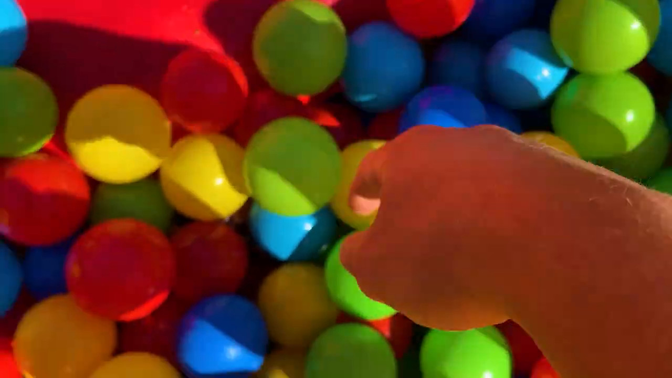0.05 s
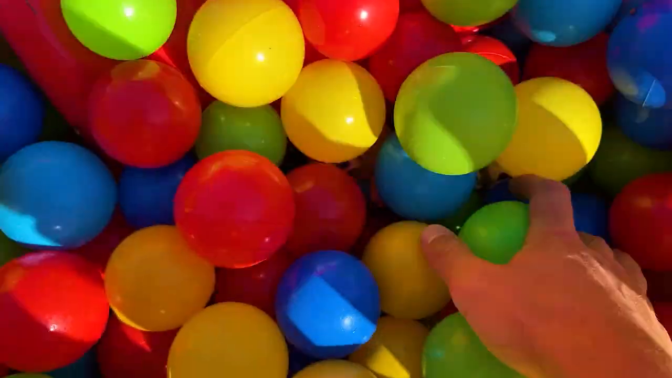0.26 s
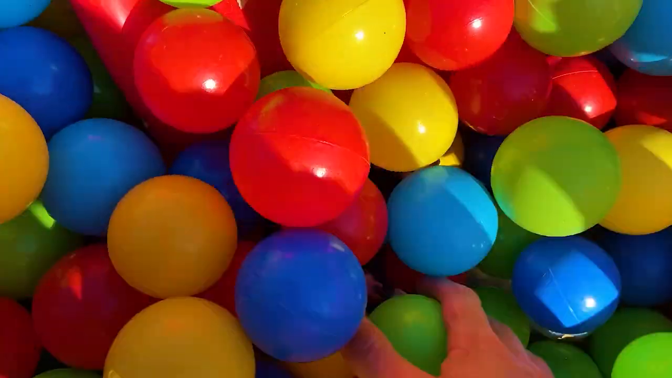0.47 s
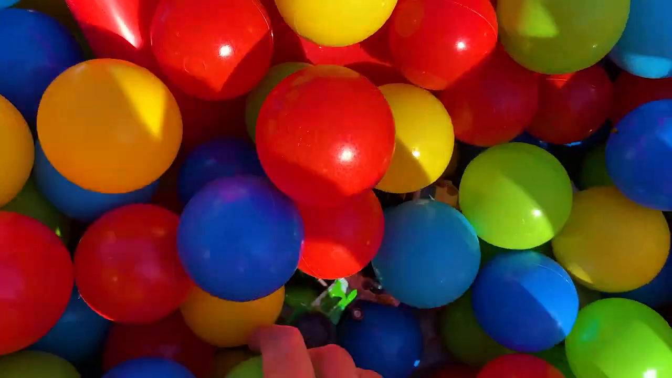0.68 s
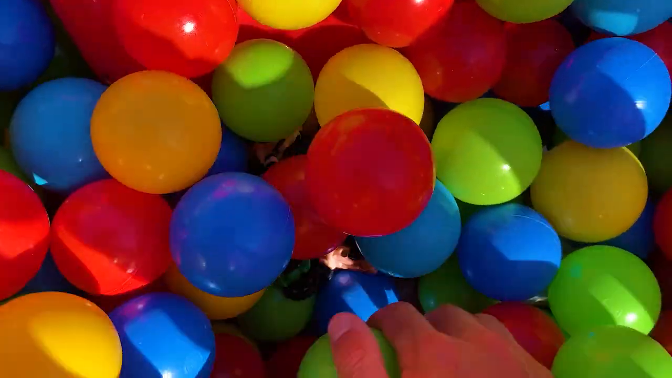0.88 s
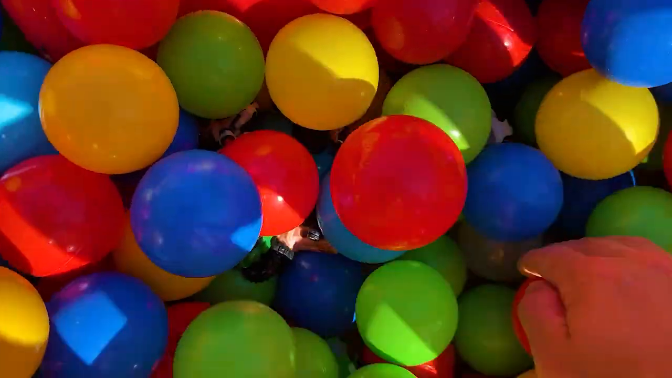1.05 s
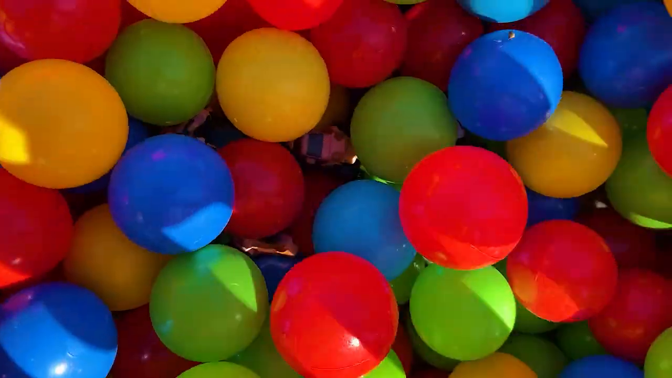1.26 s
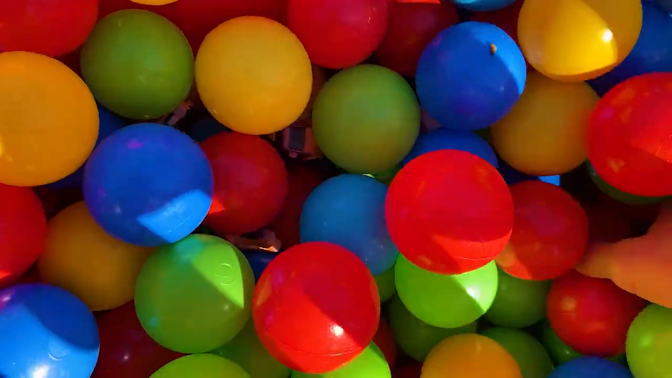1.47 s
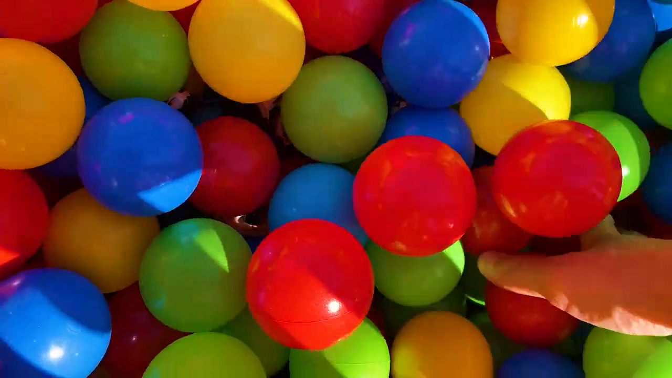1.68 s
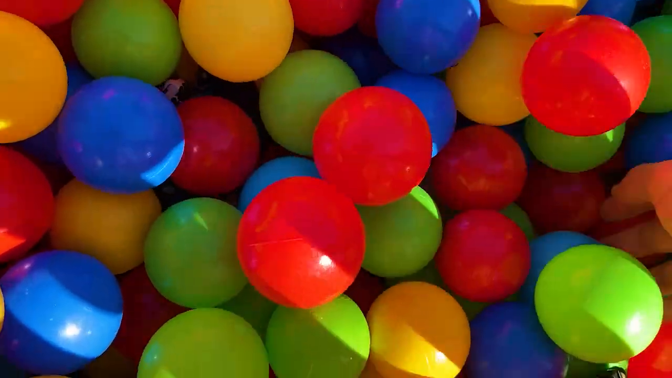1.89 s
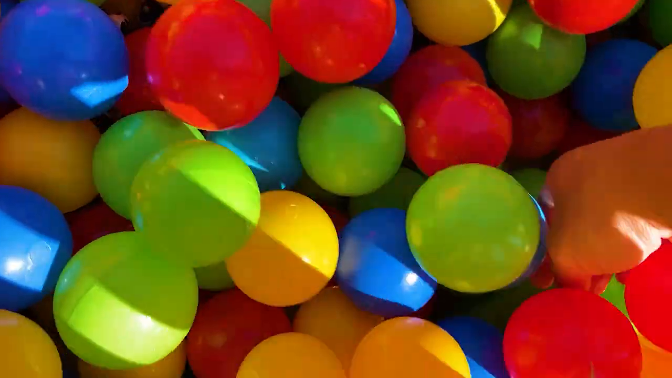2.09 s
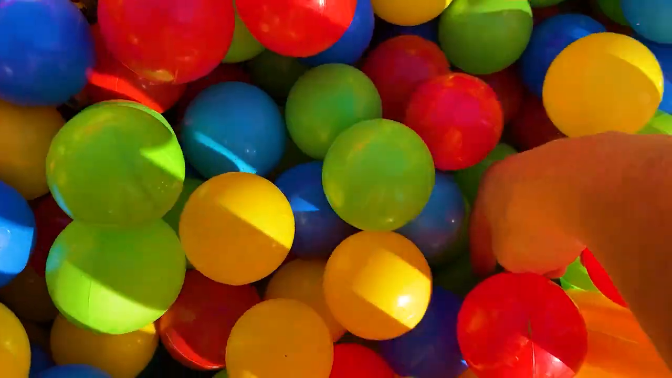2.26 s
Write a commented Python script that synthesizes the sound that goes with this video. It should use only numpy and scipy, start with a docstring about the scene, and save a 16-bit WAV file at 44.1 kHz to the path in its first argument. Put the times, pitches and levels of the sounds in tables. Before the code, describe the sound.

Hollow plastic balls knock together in a pit, close and dry. Until 0.17 s there is only low murmur, two soft nudges and faint hiss. A dense clatter with thuds, bright snaps and dent pops fills 0.2-0.75 s; a tiny hard chink follows near 0.78. Sparser knocks, deep heaving and short scrapes lead to another flurry around 1.6-1.75, then loose knocks until 2.3 s.

```python
"""A hand rummages through a pit of thin hollow plastic balls, close to the microphone.
At first there is only a murmur and two soft nudges over a faint hiss that lasts throughout. Then the hand
goes in: balls knock, ring and thud, seams snap, dents pop, and something small chinks. The heap heaves
deeply and balls scrape; another flurry of knocks and snaps follows, then looser knocks to the end.
Ringing filters make the balls, random clicks the rubbing and jostling, and shaped noise the rumble."""
import sys
import numpy as np
from scipy import signal
from scipy.fft import rfft, irfft, next_fast_len
from scipy.io import wavfile
from scipy.ndimage import uniform_filter1d

SR = 44100
rng = np.random.default_rng(int(sys.argv[2]) if len(sys.argv) > 2 else 0)


def generate_wav(sig):
    """Save sig (samples, or channels by samples) to the path in sys.argv[1] as 16-bit PCM at SR."""
    pcm = np.round(np.clip(np.atleast_2d(sig).T, -1, 1) * 32767).astype(np.int16)
    wavfile.write(sys.argv[1], SR, pcm)


N = 101430
TIME = np.arange(N) / SR  # seconds
HIT = 8192  # samples set aside for one hit


# Ball against ball, before the trims below: (t/s, ring level/dB, main ring f/Hz, shell clack level/dB,
# thud level/dB, left-over-right level/dB)
KNOCKS = [(0.176, -31, 307, -41.5, -28.5, -2), (0.214, -28.5, 403, -40, -22.5, -5),
          (0.237, -20.5, 1110, -25.5, -50, -5), (0.249, -20.5, 840, -36, -35, -7),
          (0.306, -20, 412, -22.5, -31, -9), (0.321, -19.5, 840, -36, -34, -9),
          (0.3261, -17.5, 406, -44, -28, -2), (0.3315, -19, 696, -23, -43, -3),
          (0.338, -28, 637, -27.5, -27.5, 7), (0.359, -26, 385, -27, -28, -7),
          (0.384, -31, 404, -39, -34, -9), (0.416, -24, 405, -26, -31, -4),
          (0.449, -25.5, 294, -28, -27, -1), (0.473, -23.5, 299, -30, -24, -1),
          (0.498, -24.5, 304, -27, -20, 4), (0.518, -30, 252, -42, -21, 4),
          (0.526, -33.5, 1190, -23, -31, -4), (0.56, -38, 313, -36, -21.5, 7),
          (0.592, -38, 605, -26, -52, 8), (0.614, -27, 310, -22, -36, 1),
          (0.637, -21.5, 1180, -24.5, -22.5, 0), (0.66, -32.5, 382, -33, -23.5, 2),
          (0.705, -37.5, 1114, -26, -27, 0), (0.718, -34.5, 313, -28.5, -19.5, -5),
          (0.748, -31, 390, -31, -29.5, 4), (0.802, -37.5, 1030, -42, -44, 1),
          (0.827, -28.5, 560, -32, -52, -5.5), (0.893, -29, 890, -35, -56, -7),
          (0.942, -28.5, 890, -33, -26.5, -6), (1.028, -37, 890, -37, -27.5, -7),
          (1.112, -29, 324, -28, -49, -5), (1.127, -41, 345, -34, -25, 7), (1.195, -49, 1070, -43, -24, 4),
          (1.22, -31, 1010, -36, -44, -6), (1.239, -31, 754, -56, -29, -12),
          (1.299, -32, 380, -35.5, -41, -5), (1.372, -36.5, 346, -39, -36, -4),
          (1.415, -27, 553, -41, -24, -6), (1.484, -44, 370, -41, -46, -8),
          (1.502, -35.5, 388, -63, -28, -11), (1.569, -30.5, 493, -31, -36, -2),
          (1.584, -22, 374, -49, -39, -8), (1.62, -21.5, 360, -37, -27, -7), (1.644, -28, 400, -43, -36, 0),
          (1.696, -34, 356, -48, -49, -3), (1.744, -24, 890, -36, -49, -6),
          (1.7535, -24.5, 560, -36, -48, -2), (1.808, -30, 660, -31.5, -37, -1),
          (1.938, -31, 910, -47, -31.5, -5), (1.986, -25, 890, -25, -46, -8),
          (1.9925, -30, 700, -30, -48, -2), (2.001, -26, 527, -40, -54, -5), (2.037, -33, 725, -34, -39, 1),
          (2.087, -38, 1140, -36, -60, -4), (2.14, -30, 400, -29.5, -34, -4),
          (2.172, -45, 716, -31, -59, 2), (2.2, -29.5, 516, -28.5, -54, -4.5),
          (2.278, -39.5, 786, -41, -45, -7), (2.294, -42, 740, -39, -45, -4)]
# How a hollow ball rings, before each ball's own variation: (f/Hz, level/dB, t60/s)
BALL_MODES = [(230, -9, 0.12), (321.5, 0, 0.093), (384.4, 0, 0.14), (488.5, -1.5, 0.09), (657.5, 1, 0.046),
              (807, -5, 0.1), (883, 0, 0.059), (1106, 2.5, 0.045), (1369, -5.5, 0.1)]
# How its thin shell clacks, before the same variation: (f/Hz, level/dB, t60/s)
CLACK_MODES = [(1298, 2.5, 0.015), (1764.5, -2, 0.02), (2187, -2, 0.026), (2810, -2.5, 0.014),
               (3433, -6, 0.024), (4290, -12, 0.03)]
# Relative tone of the hollow ring: (f/Hz, level/dB)
RING_TONE = [(60, -11.5), (200, -1), (400, 3), (800, 2.5), (1300, -7.5), (2500, -8.5), (6000, 9.5),
             (16000, -34)]
# Relative tone of the clack: (f/Hz, level/dB)
CLACK_TONE = [(200, -51), (800, 19.5), (1500, 6), (3000, -2), (5000, -6.5), (8000, 15.5), (16000, 6)]
# Relative tone of the thud: (f/Hz, level/dB)
THUD_TONE = [(25, -63), (55, -10), (100, -9.5), (160, -2), (230, 1), (330, -7), (700, -33.5), (3000, -64)]
RING_TRIM_DB, CLACK_TRIM_DB, THUD_TRIM_DB = 0, -3.5, -1
RING_ECHO_T60_S, CLACK_ECHO_T60_S, THUD_T60_S = 0.1, 0.053, 0.058
MAIN_MODE_DB, MAIN_MODE_CYCLES = -0.5, 20  # cycles until it has died by 60 dB
POP_DB, POP_CYCLES = -4, 4  # against the ring; cycles until it has died by 60 dB
CLACK_PITCH_SPREAD = .045  # on a natural-log pitch scale


def knocks():
    """Two balls meet: a direct pop, a hollow ring led by one mode, a shell clack and a thud into the heap."""
    out = np.zeros((2, N))
    strike = press()
    for s, ring_db, hz, clack_db, thud_db, pan_db in KNOCKS:
        contact = scatter(RING_ECHO_T60_S)
        main_mode = rms_one(ring(contact, hz, MAIN_MODE_CYCLES / hz))
        hollow = rms_one(shell(contact, BALL_MODES)) + from_db(MAIN_MODE_DB) * main_mode
        pop = from_db(POP_DB) * rms_one(ring(strike, hz, POP_CYCLES / hz))
        add(out, s, voice(rms_one(hollow) + pop, RING_TONE), ring_db + RING_TRIM_DB, pan_db)

        clack = shell(scatter(CLACK_ECHO_T60_S), CLACK_MODES, CLACK_PITCH_SPREAD)
        add(out, s, voice(clack, CLACK_TONE), clack_db + CLACK_TRIM_DB, pan_db / 2)

        thud = voice(scatter(THUD_T60_S), THUD_TONE)
        add(out, s, thud, thud_db + THUD_TRIM_DB)
    return out


POP_CONTACT_S = 0.00077  # how long the two shells stay pressed together


def press():
    """The short smooth push of two shells meeting, equal on both sides."""
    push = np.zeros((2, HIT))
    push[0] = np.sin(np.pi * np.minimum(TIME[:HIT] / POP_CONTACT_S, 1)) ** 2
    return push


# Seams snapping past each other, before the trims below: (t/s, level/dB, main f/Hz, top-treble level/dB)
SNAPS = [(0.1765, -31.5, 3000, -63), (0.237, -14.5, 3400, -50), (0.3051, -17.5, 3820, -30.5),
         (0.322, -22, 3320, -33), (0.445, -27, 6300, -43), (0.498, -17, 7100, -33),
         (0.527, -24, 3320, -34.5), (0.5885, -21.5, 5770, -40), (0.637, -21, 7150, -28.5),
         (0.665, -25, 6900, -45), (0.6811, -17.5, 3900, -29.5), (0.704, -12.5, 3110, -27.5),
         (0.7603, -23, 5620, -38.5), (0.8078, -26.5, 3660, -49), (0.938, -22, 3480, -43),
         (0.975, -28, 7200, -41), (1.3554, -30.5, 3250, -47.5), (1.583, -23, 3950, -35),
         (1.5896, -21.5, 6100, -34), (1.616, -20.5, 3420, -35.5), (1.631, -26, 6200, -35.5),
         (1.749, -27, 6250, -42), (1.758, -20.5, 3340, -41), (1.992, -35, 3300, -38.5),
         (2.137, -23.5, 3570, -37.5), (2.1992, -26.5, 3060, -45)]
# Relative tone of the crack: (f/Hz, level/dB)
SNAP_TONE = [(300, -7.5), (1500, 14.5), (3200, -4), (5000, 4), (7000, 2.5), (9000, 1), (16000, -22.5)]
# Relative tone of the fine treble on top: (f/Hz, level/dB)
TOP_TONE = [(1000, -55), (6000, -4), (9000, 2.5), (12500, 0.5), (14300, 3.5), (16000, -1.5)]
SNAP_TRIM_DB, TOP_TRIM_DB, SNAP_PAN_DB = -11, 3, -3.5
SNAP_T60_S, SNAP_RING_T60_S, SNAP_RING_DB = 0.049, .013, -2


def snaps():
    """A seam slips free: a bright crack with one brief resonance, and fine treble on top."""
    out = np.zeros((2, N))
    for s, db, hz, top_db in SNAPS:
        crack = scatter(SNAP_T60_S)
        resonance = rms_one(ring(crack, hz, SNAP_RING_T60_S))
        crack = rms_one(crack) + from_db(SNAP_RING_DB) * resonance
        add(out, s, voice(crack, SNAP_TONE), db + SNAP_TRIM_DB, SNAP_PAN_DB)
        add(out, s, voice(scatter(SNAP_T60_S), TOP_TONE), top_db + TOP_TRIM_DB)
    return out


# Shells denting: (t/s, level/dB, f/Hz)
DENTS = [(0.3073, -23, 525), (0.3418, -17, 654), (1.6211, -35, 394), (1.7436, -29.5, 800)]
DENT_CYCLES = 3.6  # until it has died by 60 dB


def dents():
    """A dented shell springs back with a dry pop, ringing for only a few cycles."""
    out = np.zeros((2, N))
    for s, db, hz in DENTS:
        spring = ring(press(), hz, DENT_CYCLES / hz)
        add(out, s, voice(spring, RING_TONE), db)
    return out


# One ball dragged over another: (t/s, length/s, level/dB)
SCRAPES = [(1.103, 0.024, -30.5), (1.206, 0.034, -32), (1.582, .022, -31), (1.616, 0.039, -33),
           (1.956, 0.021, -36)]
SLIPS_PER_S, SLIP_JITTER = 170, .35  # typical rate; unevenness of the gaps on a natural-log scale
SCRAPE_LOW_CUT_HZ = 420


def scrapes(count=40):
    """A dragged ball sticks and slips in an uneven run; every slip rings its shell."""
    out = np.zeros((2, N))
    low_cut = signal.butter(1, SCRAPE_LOW_CUT_HZ, "high", fs=SR, output="sos")
    for s, length, db in SCRAPES:
        gaps = np.exp(SLIP_JITTER * rng.standard_normal(count)) / SLIPS_PER_S
        at = np.cumsum(gaps) - gaps[0]
        sizes = rng.standard_normal((2, count))
        inside = at < length
        slips = np.zeros((2, HIT))
        slips[:, (at[inside] * SR).astype(int)] = sizes[:, inside]
        rung = shell(slips, BALL_MODES + CLACK_MODES, CLACK_PITCH_SPREAD)
        add(out, s, voice(signal.sosfilt(low_cut, rung), JOSTLE_TONE), db)
    return out


# Shells singing briefly on one resonance as they are struck or slide past each other: (t/s, level/dB, f/Hz)
SHELL_TONES = [(0.3046, -20.5, 1740), (0.319, -28.5, 2310), (1.049, -34, 2350), (1.058, -37, 2365),
               (1.991, -39, 4350), (2.139, -38, 4300), (2.175, -43, 4150), (2.277, -48.5, 4460)]
TONE_PEAK_S, TONE_RING_T60_S = .003, .032  # time to the strongest push; ring


def shell_tones():
    """A shell sings briefly: a short swell of noise keeps one resonance going for a moment."""
    out = np.zeros((2, N))
    swell = TIME[:HIT] * np.exp(-TIME[:HIT] / TONE_PEAK_S)
    for s, db, hz in SHELL_TONES:
        noise = swell * rng.standard_normal((2, HIT))
        add(out, s, voice(ring(noise, hz, TONE_RING_T60_S), CLACK_TONE), db)
    return out


# A short bright chink among the balls; the level drives both ring and crack: (t/s, level/dB)
CHINKS = [(0.763, -42.5), (0.781, -22.5), (0.783, -21), (0.807, -42)]
# What the chink rings with, relative to each touch: (f/Hz, level/dB, t60/s)
CHINK_MODES = [(3690, -4.5, 0.021), (5530, -22, .022), (5850, 5, 0.031), (6280, 1.5, 0.025),
               (6940, -18, 0.015), (12360, -9, .012)]
CHINK_PAN_DB, CHINK_CRACK_DB = -4, -15


def chinks():
    """Something small and hard is touched a few times: a fine crack and a high ring."""
    clicks, cracks = np.zeros(N), np.zeros((2, N))
    for s, db in CHINKS:
        clicks[int(s * SR)] = from_db(db)
        add(cracks, s, voice(scatter(SNAP_T60_S), TOP_TONE), db + CHINK_CRACK_DB)
    high_ring = sum(from_db(db) * ring(clicks, hz, t60) for hz, db, t60 in CHINK_MODES)
    return cracks + pan(CHINK_PAN_DB) * high_ring


# The stirring as it goes on: (t/s, jostling balls level/dB, rubbing shells level/dB, heap rumble level/dB)
STIR = [(0, -57, -60.5, -62), (.05, -65, -74, -59), (.17, -68, -71, -60), (0.178, -43, -38, -39),
        (.29, -31.5, -38.5, -39), (.32, -26, -28, -46), (.40, -25.5, -33.5, -26.5),
        (.53, -28, -31.5, -32.5), (.72, -27, -40, -31.5), (.77, -35.5, -40, -39), (.87, -33.5, -41, -38.5),
        (.95, -31.5, -38, -39), (1.06, -33, -36, -36), (1.21, -28.5, -38, -33), (1.34, -40.5, -45.5, -44.5),
        (1.43, -34.5, -43, -47), (1.55, -35, -38, -37), (1.61, -29, -31, -35), (1.68, -32.5, -40.5, -39),
        (1.81, -35.5, -39.5, -36), (1.86, -42.5, -49, -39.5), (1.92, -44.5, -43, -47),
        (2.0, -33, -43.5, -38), (2.08, -44.5, -43, -39.5), (2.15, -38.5, -37, -43.5),
        (2.209, -36.5, -53, -47), (2.235, -51, -56, -47), (2.3, -38, -43.5, -44)]
# Relative tone of the jostling: (f/Hz, level/dB)
JOSTLE_TONE = [(60, -30.5), (200, 6), (400, 1), (800, 2), (1300, -3), (2500, 3.5), (5000, -6), (16000, -12)]
# Relative tone of the rubbing: (f/Hz, level/dB)
RUB_TONE = [(200, 2.5), (800, 6), (2000, 7.5), (3300, 8.5), (4800, 0), (7000, 0.5), (10000, -2),
            (14500, -2.5), (16000, -38)]
# Relative tone of the rumble: (f/Hz, level/dB)
RUMBLE_TONE = [(25, -45), (50, -24), (70, -2.5), (95, 1), (150, -3), (220, 1.5), (350, -22), (1000, -59),
               (4000, -70)]
# average rate in each of the two streams, unevenness of size, left over right
JOSTLES_PER_S, JOSTLE_SPREAD_DB, JOSTLE_PAN_DB = 260, 0.5, -2.5
GRAINS_PER_S, GRAIN_SPREAD_DB, RUB_PAN_DB = 9000, 0.5, -0.5


def stirring(count=18):
    """Many balls jostle lightly, their shells rub in tiny slips, and the heap rumbles."""
    s, *columns = np.transpose(STIR)
    jostle, rub, rumble = [from_db(np.interp(TIME, s, column)) for column in columns]

    balls = np.zeros((2, N))
    for _ in range(count):
        taps = grains(JOSTLES_PER_S / count, JOSTLE_SPREAD_DB)
        balls += shell(taps, BALL_MODES + CLACK_MODES)
    balls = steady(voice(balls, JOSTLE_TONE), 0.18)

    slips = grains(GRAINS_PER_S, GRAIN_SPREAD_DB) * touches()
    slips = steady(voice(slips, RUB_TONE), 0.081)
    heap = steady(voice(rng.standard_normal((2, N)), RUMBLE_TONE), 0.07)
    return jostle * balls * pan(JOSTLE_PAN_DB) + rub * slips * pan(RUB_PAN_DB) + rumble * heap


TOUCHES_PER_S, TOUCH_S = 520, .004  # average rate; time for a touch's power to fall to 37 %
RUB_BASE_DB = -5.5  # the even sliding under the separate touches, before levelling


def touches():
    """Small contacts catch at random and let go quickly: the uneven strength of the rubbing."""
    catches = rng.uniform(.2, 1, N) * (rng.random(N) < TOUCHES_PER_S / SR)
    power = signal.lfilter([1], [1, -np.exp(-1 / (TOUCH_S * SR))], catches)
    return np.sqrt(power + from_db(RUB_BASE_DB) ** 2)


# Slow heave of the heap, felt more than heard: (t/s, level/dB)
HEAVE = [(0, -52), (.15, -44), (.3, -71), (.55, -65), (.75, -53), (1.0, -36.5), (1.3, -51), (1.6, -44),
         (1.85, -51), (2.3, -52)]
# Relative tone of the heave: (f/Hz, level/dB)
HEAVE_TONE = [(20, -16), (35, -13), (55, -4), (80, -6.5), (130, -8.5), (250, -52), (1000, -79)]
# Soft thuds of the barely moving heap before the hand goes in: (t/s, level/dB)
NUDGES = [(0.052, -44), (0.12, -40)]
# Relative tone of the nudges: (f/Hz, level/dB)
NUDGE_TONE = [(25, -30), (60, -2.5), (95, 3), (150, -8), (250, -30), (600, -54), (3000, -74)]


def heave():
    """The weight of the heap shifts: a deep murmur of low noise and two soft nudges."""
    murmur = steady(voice(rng.standard_normal((2, N)), HEAVE_TONE), 0.075)
    out = from_db(np.interp(TIME, *np.transpose(HEAVE))) * murmur
    for s, db in NUDGES:
        add(out, s, voice(scatter(THUD_T60_S), NUDGE_TONE), db)
    return out


# Faint steady whine in the room: (f/Hz, level/dB, t60/s); a shorter t60 makes a wider band
ROOM_WHINE = [(2310, -68.5, 0.018)]


def room():
    """A faint, narrow band of hiss hangs in the room: noise through a resonance."""
    out = np.zeros((2, N))
    for hz, db, t60 in ROOM_WHINE:
        out += from_db(db) * rms_one(ring(rng.standard_normal((2, N)), hz, t60))
    return out


ECHOES_PER_S, FIRST_CONTACT = 4000, 1.86  # average echo rate; height of the first click
CONTACT_RISE_S = 0.0011  # time constant of the echoes' build-up


def scatter(t60):
    """A contact followed by its dying echoes off the neighbouring balls."""
    echoes = rng.standard_normal((2, HIT)) * (rng.random((2, HIT)) < ECHOES_PER_S / SR)
    echoes *= 1 - np.exp(-TIME[:HIT] / CONTACT_RISE_S)
    echoes[0, 0] = FIRST_CONTACT
    return echoes * from_db(-60 * TIME[:HIT] / t60)


PITCH_SPREAD, MODE_SPREAD_DB = 0.0736, 4  # pitch on a natural-log scale


def shell(x, modes, spread=PITCH_SPREAD):
    """One ball rings, at a pitch and with mode strengths of its own."""
    pitch = np.exp(spread * rng.standard_normal())
    out = np.zeros_like(x)
    for k, (hz, db, t60) in enumerate(modes):
        strength = from_db(db + MODE_SPREAD_DB * rng.standard_normal())
        out += (-1) ** k * strength * ring(x, hz * pitch, t60)  # neighbouring modes push opposite ways
    return out


def ring(x, hz, t60):
    """One resonance that dies by 60 dB in t60 seconds; a unit click rings at height 1."""
    r, w = from_db(-60 / (t60 * SR)), 2 * np.pi * hz / SR
    return signal.lfilter([1, 0, -1], [1, -2 * r * np.cos(w), r * r], x + 1e-18) / 2


def grains(per_s, spread_db):
    """Two unrelated streams of random clicks of uneven size."""
    sizes = from_db(spread_db * np.minimum(rng.exponential(1, (2, N)), 4))
    return sizes * rng.choice([-1, 1], (2, N)) * (rng.random((2, N)) < per_s / SR)


# How alike the two microphone ports hear each pitch: (f/Hz, likeness from 0 to 1)
LIKENESS = [(100, .97), (300, .92), (700, .75), (1200, .5), (1700, .25), (2700, .25), (3500, .5),
            (5000, .4), (6500, .75), (8000, .85), (8700, .99), (9500, .99), (10300, .8), (13800, .85),
            (15000, .99)]


def voice(pair, tone):
    """Colour two unrelated signals without pre-echo and blend them into left and right."""
    n = pair.shape[-1]
    size = 2 * next_fast_len(n)
    hz = np.fft.rfftfreq(size, 1 / SR)
    # folding the cepstrum makes the filter respond only after the sound (minimum phase)
    cepstrum = irfft(np.log(from_db(at_hz(tone, hz))))
    cepstrum[1:size // 2] *= 2
    cepstrum[size // 2 + 1:] = 0
    mid, side = rfft(pair, size) * np.exp(rfft(cepstrum))
    alike = np.clip(at_hz(LIKENESS, hz), 0, 1)
    ears = np.sqrt(1 + alike) * mid + np.sqrt(1 - alike) * side * [[1], [-1]]
    return irfft(ears)[:, :n]


LEVEL_SPAN_S = 0.014  # a hit's level is its energy spread over this time


def add(out, s, sound, db, pan_db=0):
    """Mix in one hit at a given time and level."""
    start = int(s * SR)
    gain = from_db(db) * np.sqrt(LEVEL_SPAN_S * SR / HIT)
    out[:, start:start + HIT] += (gain * pan(pan_db) * rms_one(sound))[:, :N - start]


def steady(x, span_s):
    """Even out the slow level, so that a level table can set it."""
    return x / np.sqrt(uniform_filter1d(np.mean(x ** 2, axis=0), int(span_s * SR)) + 1e-12)


def from_db(db):
    """Decibels to gain."""
    return 10 ** (np.asarray(db) / 20)


def rms_one(x):
    """Scale to unit rms (average strength 1)."""
    return x / np.sqrt(np.mean(x ** 2) + 1e-20)


def pan(db):
    """Left and right gains for a level difference."""
    return from_db([[db / 2], [-db / 2]])


def at_hz(points, hz):
    """Read a table on a log-frequency axis."""
    f, value = np.transpose(points)
    return np.interp(np.log(hz + 1), np.log(f), value)


def scene():
    """Everything that sounds in and around the pit."""
    balls = knocks() + dents() + scrapes() + snaps() + shell_tones() + chinks()
    return balls + stirring() + heave() + room()


# How far the left microphone port leads the right: (f/Hz, phase/radians)
PORT_PHASE = [(0, 0), (400, -.45), (1000, -1.7), (1500, -1.2), (2000, 0), (3000, -.4), (5800, -.5),
              (6700, .3), (8700, 3.05), (9500, 3.25), (11800, 6.1), (12800, 6.5), (15000, 9.35)]
CEILING, CUTOFF_HZ = .9, 15600  # the ceiling is in full-scale units


def record(dry):
    """The two ports hear the sound out of step; the highest peaks are rounded and the top is cut."""
    size = next_fast_len(N + HIT, real=True)
    phase = np.interp(np.fft.rfftfreq(size, 1 / SR), *np.transpose(PORT_PHASE))
    turn = np.exp(.5j * phase * [[1], [-1]])  # half the lead to each side
    ports = irfft(rfft(dry, size) * turn, size)[:, :N]
    ports = ports / (1 + (ports / CEILING) ** 6) ** (1 / 6)
    top_cut = signal.ellip(8, .1, 60, CUTOFF_HZ, fs=SR, output="sos")
    return signal.sosfiltfilt(top_cut, ports)


dry = scene()
out = record(dry)
generate_wav(out)
```